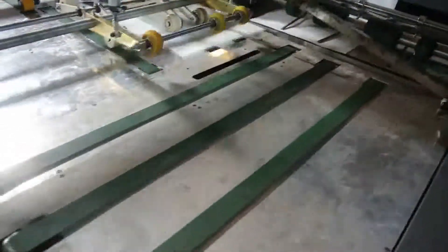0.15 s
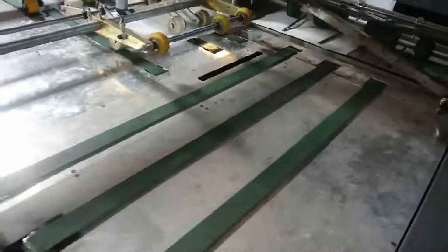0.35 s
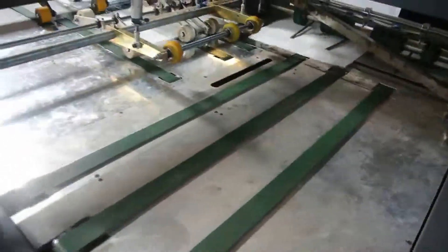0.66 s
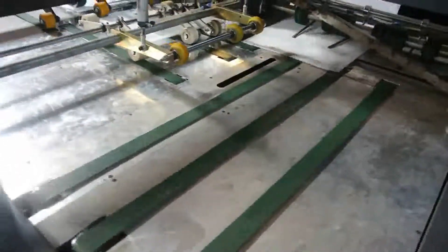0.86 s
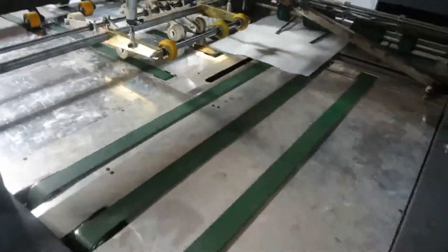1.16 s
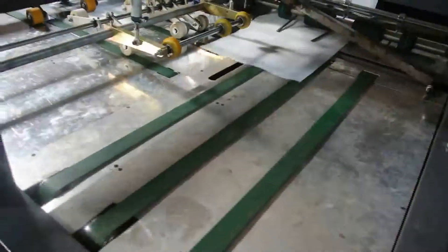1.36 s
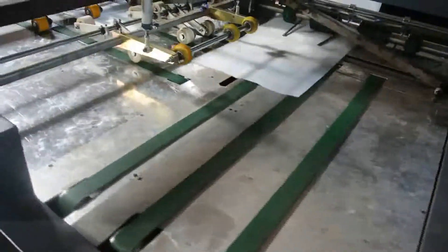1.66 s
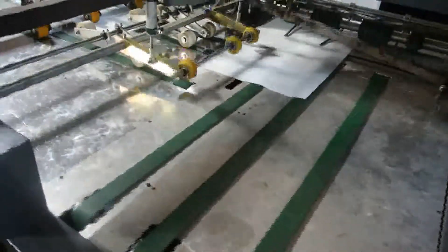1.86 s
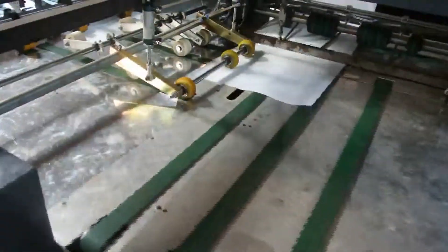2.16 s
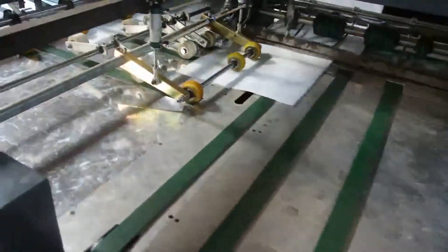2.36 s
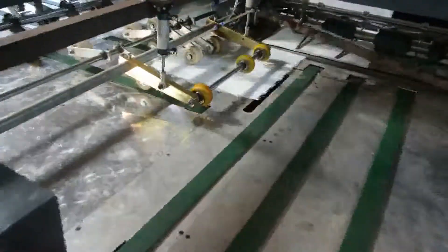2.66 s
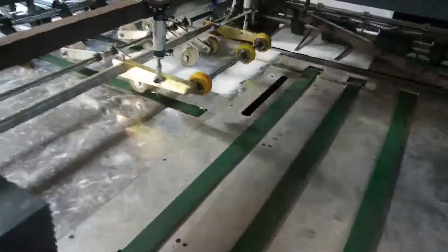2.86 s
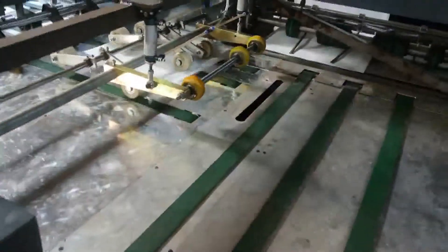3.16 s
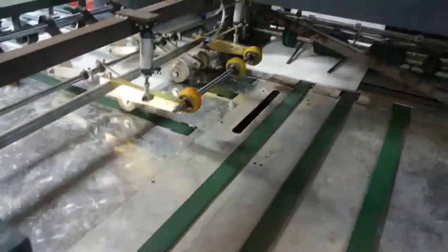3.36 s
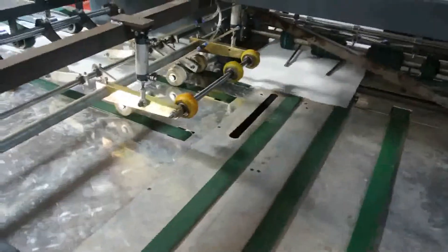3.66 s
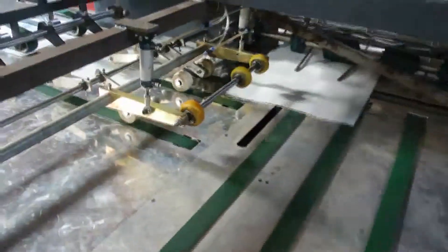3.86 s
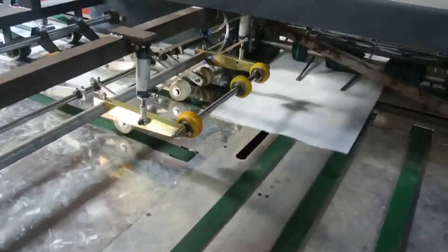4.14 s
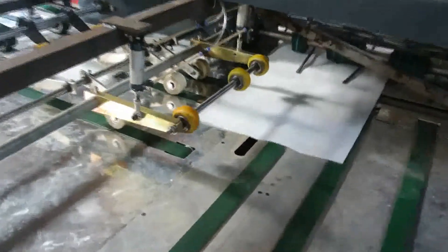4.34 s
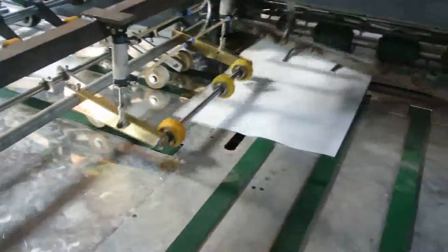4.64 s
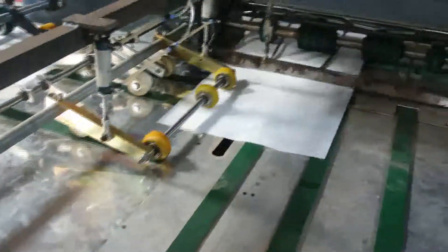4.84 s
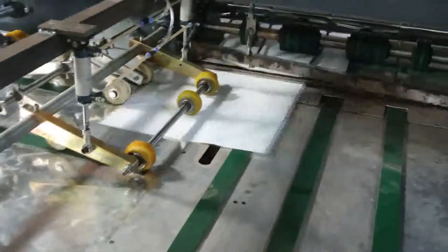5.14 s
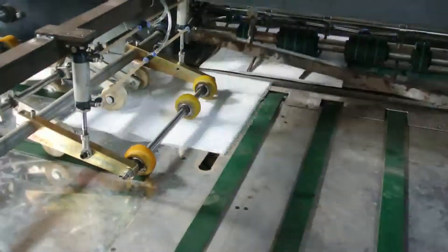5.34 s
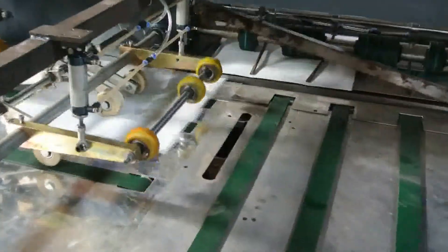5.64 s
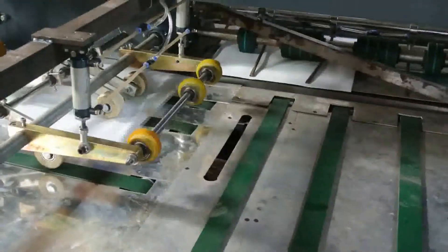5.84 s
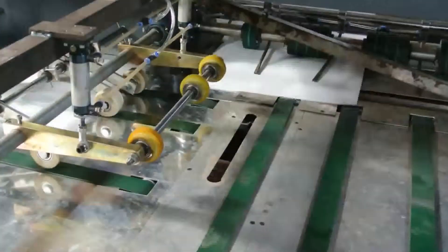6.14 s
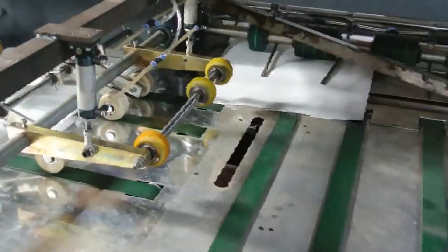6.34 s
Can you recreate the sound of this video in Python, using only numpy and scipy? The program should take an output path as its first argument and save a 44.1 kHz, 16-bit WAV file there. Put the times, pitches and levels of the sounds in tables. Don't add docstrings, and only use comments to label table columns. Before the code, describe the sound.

Pneumatic machine cycles in a rumbling workshop: snapping air blasts, long hisses, then quick exhaust jets sliding down in pitch into whistles.

```python
import sys
import numpy as np
from scipy import signal
from scipy.fft import rfft, irfft, next_fast_len
from scipy.io import wavfile
from scipy.ndimage import uniform_filter1d, map_coordinates

SR = 44100
rng = np.random.default_rng(int(sys.argv[2]) if len(sys.argv) > 2 else 0)


def persist_wave(psi):
    counts = np.round(np.clip(psi, -1, 1) * 32767).astype(np.int16)
    wavfile.write(sys.argv[1], SR, np.atleast_2d(counts).T)


def makeup_ratio(level_db):
    decades = np.asarray(level_db, float) / 20
    return 10 ** decades


N = 286638
STEP = 32


def unit(x):
    return x / np.sqrt(np.mean(np.abs(x) ** 2) + 1e-20)


def along(points, hz):
    f, value = np.transpose(points)
    return np.interp(np.log(hz + 1), np.log(f + 1), value)


def coarse():
    return np.arange(0, N + STEP, STEP) / SR


def fine(control):
    return np.interp(np.arange(N) / SR, coarse(), control)


def wobble(rate):
    knots = rng.standard_normal(int(N * rate / SR) + 4)
    return map_coordinates(knots, [np.arange(N) * rate / SR])


def swell(u, attack, hold, sag_db, release_db):
    fall_db = sag_db * np.clip(u, 0, hold) + release_db * np.clip(u - hold, 0, None)
    return np.clip(u / abs(attack), 0, 1) ** 2 * makeup_ratio(-2 * fall_db)


def filtered(x, response):
    m = next_fast_len(N + 8192)
    hz = np.fft.rfftfreq(m, 1 / SR)
    return irfft(rfft(x, m) * response(hz), m)[..., :N]


def patchy(patchy_db):
    z = signal.stft(rng.standard_normal((2, N)), nperseg=512)[2]
    field = uniform_filter1d(rng.standard_normal(z.shape[1:]), size=5, axis=0)
    field = uniform_filter1d(field, size=10, axis=1)
    return signal.istft(z * makeup_ratio(patchy_db * unit(field)), nperseg=512)[1][:, :N]


def stereo(pair, alike):
    def mid_side(hz):
        turn = np.arccos(np.clip(along(alike, hz), -1, 1)) / 2
        return np.array([np.cos(turn), np.sin(turn)])

    mid, side = filtered(pair, mid_side)
    return np.array([mid + side, mid - side])


def shop():
    # (f/Hz, level/dB)
    rumble = [(15, -62), (25, -36), (60, -24), (134, -13), (335, -7), (660, -6.5), (1020, -6.5), (1700, -6),
              (3000, -8.5), (5000, -11.5), (7000, -12), (9000, -12.5), (13000, -14), (16000, -25)]
    # (f/Hz, correlation)
    rumble_alike = [(40, .75), (90, .84), (180, .91), (350, .89), (700, .8), (1400, .5), (3000, .2),
                    (6000, 0), (15000, -.05)]
    # (f/Hz, level/dB)
    motors = [(383, -62.5), (631, -64.5), (829, -59.5), (1081, -66), (1666, -63.5)]
    # (level/dB, slope/dB/s)
    shop_fades = (-44.5, -0.49)
    # (t/s, level/dB, lasts/s)
    drive = ((.1, 1.5, 30), [(-.2, -46.5, 1), (1.68, -48, .2), (2.05, -42.5, .22), (2.3, -48, .4),
             (4.76, -45, .45), (5.3, -47, 0.94)])

    t = np.arange(N) / SR
    start_db, slope_db = shop_fades
    power = makeup_ratio(2 * (start_db + slope_db * t))
    (attack, sag_db, release_db), strokes = drive
    for s, db, hold in strokes:
        power = power + makeup_ratio(2 * db) * swell(t - s, attack, hold, sag_db, release_db)
    noise = stereo(patchy(patchy_db=1.5), rumble_alike)
    bed = unit(filtered(noise, lambda hz: makeup_ratio(along(rumble, hz))))
    tones = 0
    for hz, db in motors:
        hum = np.sin(2 * np.pi * hz * t + 1.74 * wobble(8))
        tones = tones + makeup_ratio(db + 4.7 * wobble(4.5)) * hum
    return np.sqrt(power) * makeup_ratio(5.5 + 0.25 * wobble(12)) * bed + tones


def piston_thuds():
    # (t/s, level/dB)
    thuds = [
        (.487, -26),
        (1.71, -35),
        (2.51, -37),
        (3.217, -27),
        (3.244, -29),
        (4.79, -46),
        (5.25, -32),
        (5.955, -30.5),
    ]
    # (f/Hz, t60/s, level/dB)
    frame = [(70, .04, -30), (160, .03, -14), (560, .03, -5)]

    out = np.zeros((2, N + SR))
    t = np.arange(SR // 8) / SR
    panels = signal.butter(2, [400, 1300], "band", fs=SR, output="sos")
    for s, db in thuds:
        ring = sum(makeup_ratio(level - 60 * t / t60) * np.sin(2 * np.pi * hz * t) for hz, t60, level in frame)
        rattle = unit(signal.sosfilt(panels, rng.standard_normal(len(t)))) * makeup_ratio(-11 - 60 * t / 0.17)
        soft_start = 1 - np.exp(-t / 0.0018)
        out[:, round(s * SR):][:, :len(t)] += makeup_ratio(db) * (ring + rattle) * soft_start
    return out[:, :N]


def valve_clicks():
    # (t/s, peak level/dB, low ring level/dB, left-right/dB, t60/s)
    clicks = [
        (.184, -24, -14, 7, .03),
        (0.4958, -9, -9, 5.5, .0025),
        (2.919, -30, -20, 1, .03),
        (3.226, -16, -12, 2, 0.0098),
        (5.052, -17, -11, 0, .004),
        (5.658, -30, -16, 0, 0.029),
        (5.967, -10, -15, 2, 0.0036),
    ]

    out = np.zeros((2, N + SR))
    t = np.arange(SR // 8) / SR
    for s, db, low_db, pan_db, t60 in clicks:
        burst = rng.standard_normal(len(t)) - 3 * (t == 0)
        snap = np.convolve(burst * makeup_ratio(-60 * t / t60), [1, 0, -1])[:len(t)]
        ring = makeup_ratio(low_db - 60 * t / 0.0034) * np.sin(2 * np.pi * 1500 * t)
        tick = snap / np.abs(snap).max() + ring
        tick = tick + .5 * np.roll(tick, 40)
        out[:, round(s * SR):][:, :len(t)] += makeup_ratio(db) * tick * makeup_ratio([[pan_db / 2], [-pan_db / 2]])
    return out[:, :N]


def whistle(voice, width_hz, steady, shift_hz=0):
    (excess_hz, glide, droop_hz, sag_db, release_db, bead_db), rows = voice
    t = coarse()
    latest = np.clip(np.searchsorted([row[0] for row in rows], t) - 1, 0, None)
    s, settled_hz = np.transpose(rows)[[0, -1]][:, latest]
    slide_hz = excess_hz * np.exp(-np.abs(t - s) / glide)
    hz = fine(settled_hz + slide_hz - droop_hz * np.clip(t - s, 0, .5))
    power = 0
    for start, db, attack, hold, _ in rows:
        power = power + makeup_ratio(2 * db) * swell(t - start, attack, hold, sag_db, release_db)
    keep = np.exp(-2 * np.pi * width_hz / SR)
    slow = signal.lfilter([1], [1, -2 * keep, keep ** 2], rng.standard_normal((3, 2, N)))
    drift = unit(slow[:, 0] + 1j * slow[:, 1])
    carrier = np.exp(2j * np.pi * np.cumsum(hz + shift_hz) / SR)
    tone = (steady + drift[0] + .9 * drift[1:]) * carrier
    return unit(tone.real) * makeup_ratio(bead_db * wobble(45)) * fine(np.sqrt(power))


def low_whistle():
    low_voice = ((12, .05, 0, 10, 450, 1.5), [(-.1, -43, .05, .195, 2058), (.1, -41, .012, .075, 2050),
                 (.185, -40, .015, .03, 2060), (.22, -45.5, .03, .2, 2050), (2.61, -41, .07, .12, 2066),
                 (2.735, -37, .03, .12, 2062), (2.86, -50, .06, .33, 2052), (5.35, -35, .1, .265, 2072),
                 (5.635, -37, .012, .03, 2078), (5.7, -48, .02, .045, 2065), (5.78, -49, .02, .12, 2070)])
    return whistle(low_voice, width_hz=25, steady=2.2)


def middle_whistle():
    held_voice = ((280, .055, 420, 18, 300, 1.8), [(1.775, -30, .015, .26, 3550),
                  (4.485, -34, .1, .295, 3570)])
    catch_voice = ((-170, .08, 0, 95, 200, 1.8), [(2.06, -33, .012, .17, 3470),
                   (4.762, -31, .035, .19, 3400), (4.95, -33, .015, .05, 3850)])
    tones = sum(whistle(voice, width_hz=105, steady=.4) for voice in (held_voice, catch_voice))
    return tones * makeup_ratio([[-1.2], [1.2]])


def high_whistle():
    high_voice = ((30.5, .03, 0, 42, 130, 1.2), [(-.22, -29.5, .02, .55, 4880), (2.53, -30, .02, .5, 4880),
                  (5.27, -31, 0.022, .58, 4880)])
    chirp_voice = ((30.5, 0, 0.5, 100, 480, .8), [(2.505, -19.5, .016, 0.016, 4890),
                   (5.24, -20, .016, 0.017, 4860)])
    out = 0
    for voice in (high_voice, chirp_voice):
        out = out + makeup_ratio(-2) * whistle(voice, width_hz=110, steady=.5, shift_hz=110)
        out = out + makeup_ratio(-5) * whistle(voice, width_hz=110, steady=0, shift_hz=-190)
    return out


def hiss():
    # (f/Hz, level/dB)
    nozzle = [(700, -34), (1200, -18.5), (1800, -17), (2100, -12.5), (2350, -9.5), (2850, -5.5),
              (4100, -4.5), (5500, -3.5), (7400, -1), (9700, -1), (11900, 7.5), (13200, 5.5), (15200, 6.5),
              (16000, -8)]
    # (f/Hz, left-right phase/rad)
    nozzle_lead = [(2000, -.2), (7000, -.1), (9000, -.6), (12000, -1.5), (15500, -2.7)]
    # (f/Hz, left-right/dB)
    nozzle_pan = [(60, 0.5), (180, 0.0), (550, -9), (1650, -2.5), (4970, -2.5), (15000, 5)]
    # (f/Hz, correlation)
    nozzle_alike = [(1500, .6), (4000, .45), (8000, .5), (15000, .52)]
    blast_valves = { "surge": ((.022, 10, 150), [(.503, -30, .03, -5, 3), (3.232, -26, 0.018, -9, -1),
                    (5.97, -35, 0.037, -1.5, 7)]), "lifting blast": ((.007, 2.9, 80),
                    [(.494, -29, .39, -8.5, 1.5), (3.221, -31, .4, -7, 0), (5.969, -32, .33, -3.5, 6.5)]),
                    "hold-down blast": ((0.013, 0.35, 120), [(.494, -33, 1.22, -8, 1),
                    (3.221, -33, 1.22, -6.5, 3), (5.965, -37, 1.22, -4, 6)]),
                    "sheet lift": ((0.11, 1.5, 43), [(1.05, -35, .25, -3.5, 7), (1.5, -32.5, 0.12, -8, 3),
                    (4.2, -49, .15, -10, 1)]), }
    exhausts = { "gripper vent": ((0.0066, 65, 39), [(1.714, -27, .1, -1.5, .5),
                (4.449, -34, 0.093, -0.77, -.5)]), "roller vent": ((0.031, 27, 39),
                [(2.01, -34, 0.25, 0, 3.2), (4.765, -34.5, 0.21, -2, 1.8)]), "clamp vent": ((0.013, 34, 92),
                [(2.218, -31, 0.026, 0, 5.2), (4.955, -30, .12, 0, 3)]), "knife vent": ((0.0066, 95, 85),
                [(2.508, -28, 0.089, 2.5, 3), (5.241, -30.5, 0.17, 4.3, 3.1)]),
                "afterflow": ((0.061, 5.7, 140), [(-.2, -42.5, 0.36, 3.5, 2), (1.8, -42, .25, -14, -2),
                (2.55, -42.5, 0.32, 0, 1.5), (4.5, -38.5, 0.3, -7, -0.088), (5.28, -42.5, .42, 4, 1)]),
                "pilot air": ((.025, 1.5, 300), [(.465, -40, .03, -1, 1.5), (5.94, -41, .03, -3, 2.5)]),
                "puff": ((.004, 55, 250), [(.184, -40, .01, 1, 2), (2.916, -41, .01, -4, 0.45),
                (5.655, -44, .01, 1.5, .5), (5.74, -49, 0.0093, -6, 2.9)]), }
    # (level under the jet/dB, lead/s)
    seep = (-17, .008)

    t = coarse()
    seep_db, seep_lead = seep
    power = makeup_ratio(2 * -54)
    for (attack, sag_db, release_db), rows in {**blast_valves, **exhausts}.values():
        for s, db, hold, body_db, edge_db in rows:
            flow = swell(t - s, attack, hold, sag_db, release_db)
            flow = flow + makeup_ratio(2 * (seep_db - 8 * np.abs(t - s) / seep_lead))
            power = power + makeup_ratio(2 * (db + np.array([[0], [body_db], [edge_db]]))) * flow

    def two_sides(hz):
        left = makeup_ratio(along(nozzle_pan, hz) / 2) * np.exp(.5j * along(nozzle_lead, hz))
        return makeup_ratio(along(nozzle, hz)) * left ** np.array([[1], [-1]])

    air = filtered(stereo(patchy(patchy_db=1.0), nozzle_alike), two_sides)
    low = filtered(air, lambda hz: along([(4500, 0.78), (6500, 0.023)], hz))
    top = filtered(air, lambda hz: along([(9000, 0), (11500, 1)], hz))
    middle, body, edge = map(fine, np.sqrt(power))
    flutter_db = 0.34 * wobble(40) + 0.63 * wobble(400)
    return makeup_ratio(flutter_db) * (middle * unit(air - low - top) + body * unit(low) + edge * unit(top))


def through_ports(air):
    ports = { "blast": ((2900, 0.0069, 150, 0.093, 45, 0.2), [(3.222, -38, 2100, .1, -6),
             (5.96, -41, 2000, .12, -2)]), "gripper": ((8000, .01, 250, .05, 35, .36),
             [(1.715, -25.5, 3200, .04, -8), (4.445, -29.5, 3200, .045, -6)]),
             "roller": ((3900, 0.044, 5, 0.089, 250, 0.17), [(2.08, -36, 900, 0.024, -6),
             (4.82, -40, 900, 0.017, 0)]), "clamp": ((4300, .012, 30, .06, 200, .12),
             [(2.215, -33, 2300, .022, 3), (4.95, -32, 1550, .038, 12)]), }
    fast_ports = { "knife": ((3000, .006, 60, .032, 500, .07), [(2.372, -30, 1080, .007, -4),
                  (5.098, -25.5, 1060, .005, -3)]), "knife tail": ((1250, .02, 100, .08, 60, 0.15),
                  [(2.395, -37, 1100, .03, -6), (5.125, -34, 1200, .03, -4)]),
                  "long cylinder": ((5600, .01, 15, .088, 350, .14), [(2.505, -28.5, 2200, .032, 0),
                  (5.24, -32.5, 1980, .036, 13)]), "long tail": ((2400, 0.033, 27, .3, 60, .38),
                  [(2.6, -37, 2100, .04, -3), (5.34, -40, 2100, .04, -3)]), }

    both = np.concatenate([air, rng.standard_normal((2, N))])
    hz, t, z = signal.stft(both, SR, nperseg=256, noverlap=128)
    gate, power = np.ones(z.shape[1:]), np.zeros(z.shape[1:])
    for (open_hz, attack, sag_db, hold, release_db, lasts), rows in {**ports, **fast_ports}.values():
        for s, db, settled_hz, glide, singing_db in rows:
            live = (t > s) & (t < s + lasts)
            edge_hz = settled_hz + (open_hz - settled_hz) * np.exp(-(t[live] - s) / glide)
            u = (hz[:, None] + 1) / edge_hz
            above = u ** 16 / (1 + u ** 16)
            ridge = 1 / (1 + ((u - 1.04 / u) / .13) ** 2) ** 2
            shape = ridge + makeup_ratio(-2 * singing_db) * above / u ** 3
            gate[:, live] = np.minimum(gate[:, live], makeup_ratio(-9) + above)
            flow = makeup_ratio(2 * db) * swell(t[live] - s, attack, hold, sag_db, release_db)
            power[:, live] += shape / shape.mean(0) * flow
    z = z * np.array([gate, gate, np.sqrt(power), np.sqrt(power)])
    x = signal.istft(z, SR, nperseg=256, noverlap=128)[1][:, :N]
    jets = stereo(x[2:], [(1000, 0.91), (3000, 0.086), (8000, 0.052)]) * makeup_ratio([[-1.], [1.]])
    return x[:2] + jets


def scene():
    knocks = piston_thuds() + valve_clicks()
    whistles = low_whistle() + middle_whistle() + high_whistle()
    return shop() + knocks + whistles + through_ports(hiss())


def low_pass(x):
    return signal.sosfilt(signal.butter(12, 16000, fs=SR, output="sos"), x)


def record(dry):
    limited = filtered(dry, lambda hz: hz < 15970)
    return low_pass(limited)


dry = scene()
out = record(dry)
persist_wave(out)
```